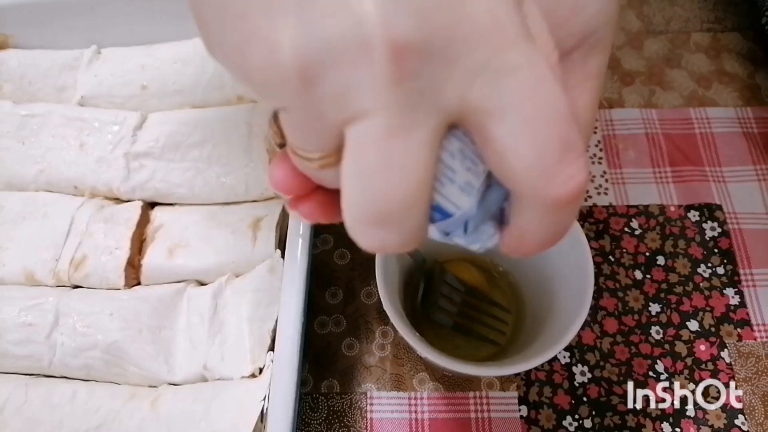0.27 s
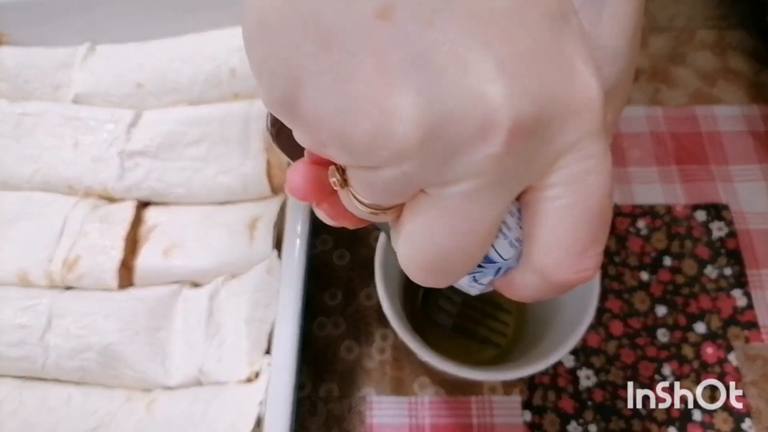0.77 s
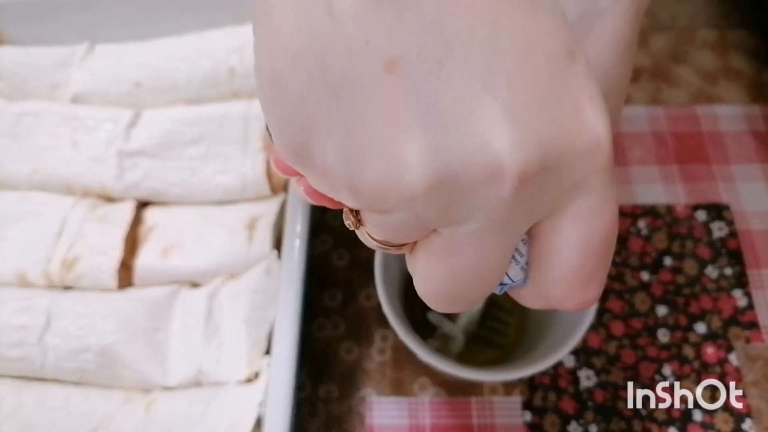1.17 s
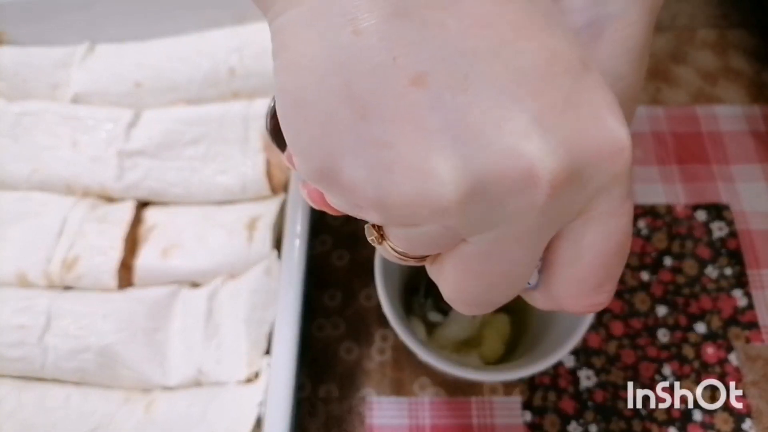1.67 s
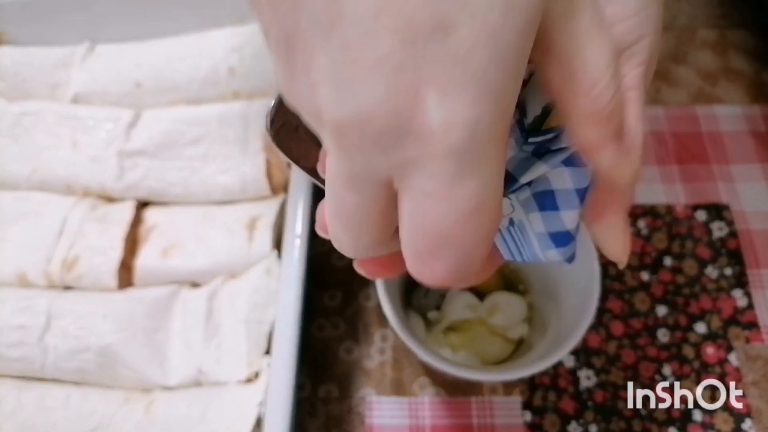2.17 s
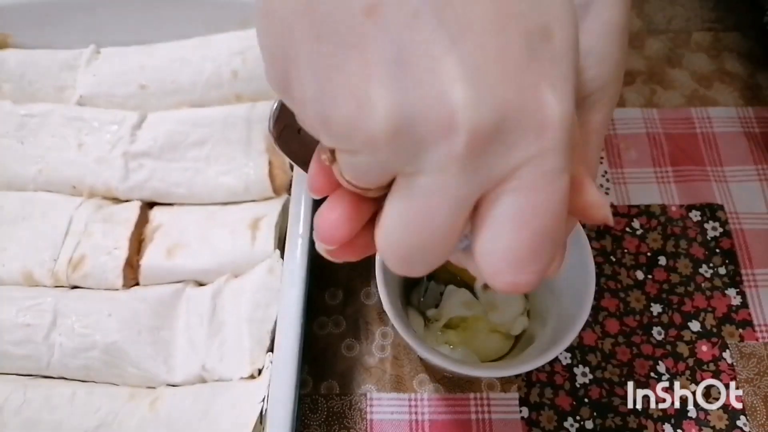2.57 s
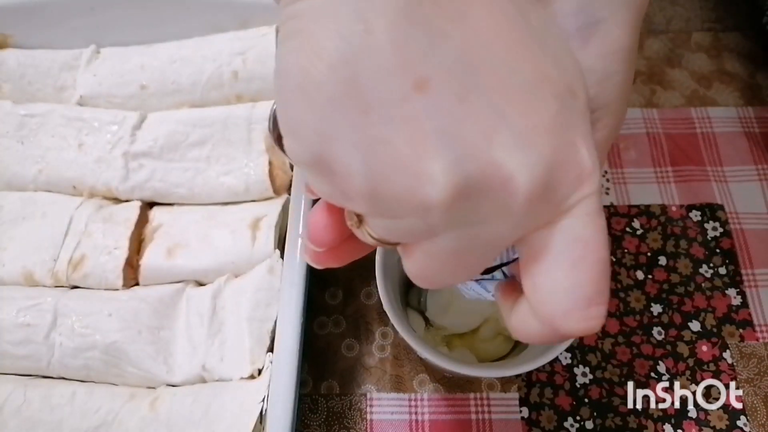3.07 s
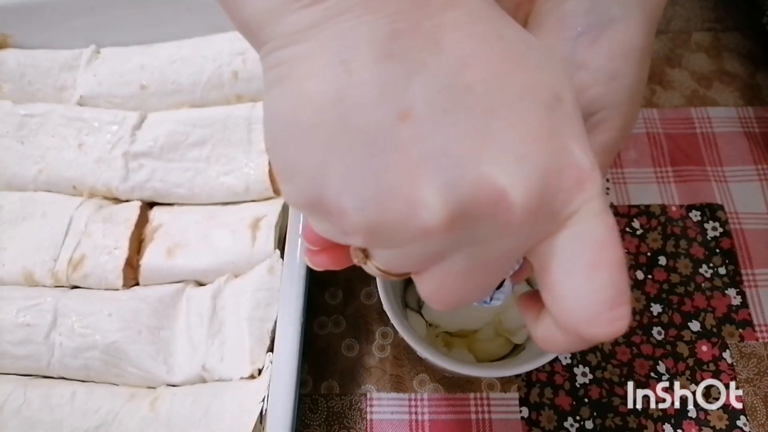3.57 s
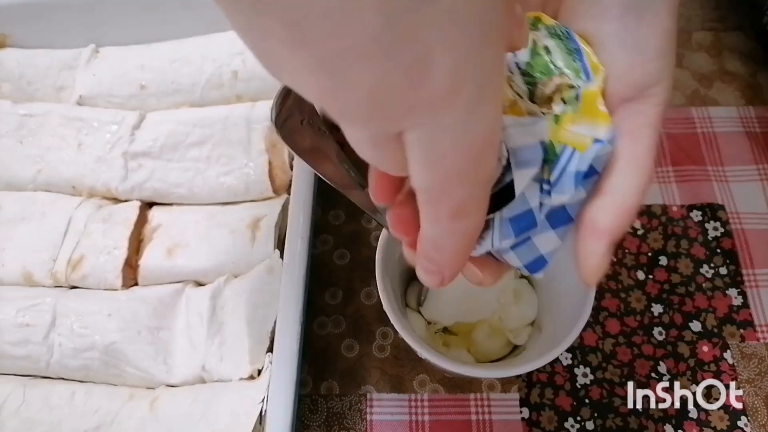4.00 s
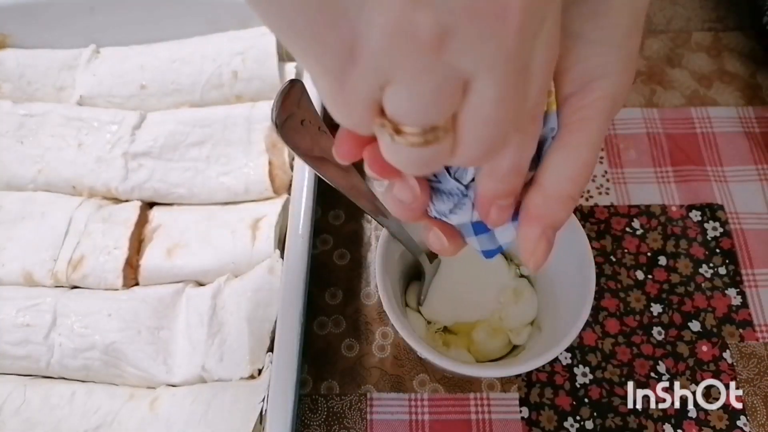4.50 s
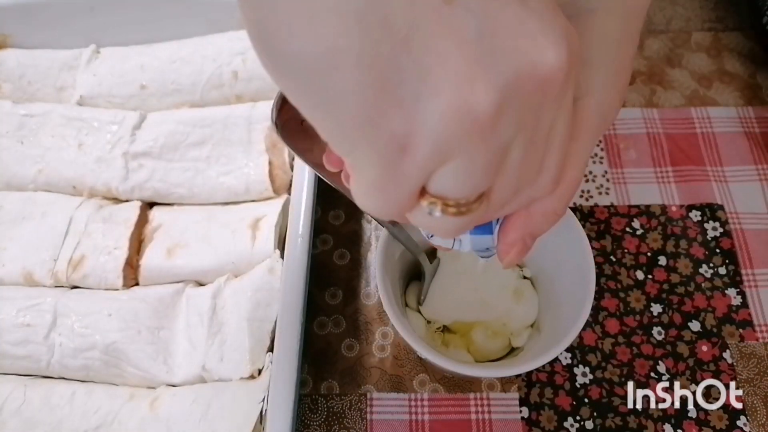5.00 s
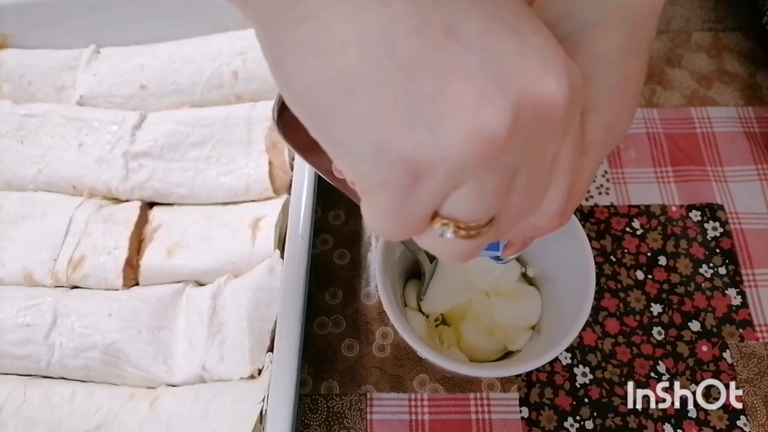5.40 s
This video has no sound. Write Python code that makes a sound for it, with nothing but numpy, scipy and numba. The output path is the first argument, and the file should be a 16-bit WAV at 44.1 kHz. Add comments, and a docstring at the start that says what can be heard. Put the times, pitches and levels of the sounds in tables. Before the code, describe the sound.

A close stereo perspective in a small, quiet kitchen with a short tail and faint steady hiss. At 0 s a thin, high steel ring from a fork knocked on a cup fades within about 0.3 s. Plastic film rustles dully, with padded finger bumps at 0.4-0.6 s and a crisp crease at 0.8 s. From about 1.2 to 2.0 s comes the longest, strongest squeeze: sharp bright pops and spitting air thicken over a wet gurgle, with hollow plops around 1000-1300 Hz, strongest near 1.5 and 1.8 s. Crinkling and soft kneading rumble follow until 3.0 s. A few pops lead into a second, shorter squelch at 3.3-3.7 s, ending in small hollow gulps. Creases snap at 3.8 s, then sparse quiet rustling; a barely audible low hum enters at 4.5 s. A brief third spurt at 5.1-5.4 s spits and plops, before a last crackle at 5.5-5.6 s.

```python
"""A fork knocked against a cup rings out, then a soft plastic pouch rustles as the hands take new grips.
In three squeezes air pops and spits at the torn corner and thick cream plops into the hollow of the cup.
Clicks are noise-scattered pushes into resonances; spit, gurgle and rustle are filtered random grains;
plops, bubbles, bumps and fork are decaying sines. A small kitchen tail, faint hum and hiss lie behind."""
import sys
import numpy as np
from scipy import signal
from scipy.fft import rfft, irfft, next_fast_len
from scipy.io import wavfile
from scipy.ndimage import uniform_filter1d
from numba import njit

SR = 44100
rng = np.random.default_rng(int(sys.argv[2]) if len(sys.argv) > 2 else 0)


def materialize(psi):
    """Save the field psi as 16-bit PCM at rate SR to the path in sys.argv[1].

    A 1-D psi becomes a single channel; in a 2-D psi each row is a channel.
    """
    bounded = np.clip(np.atleast_2d(psi).T, -1, 1)
    quanta = np.round(bounded * 32767).astype(np.int16)
    wavfile.write(sys.argv[1], SR, quanta)


N = 249184
T = np.arange(N) / SR

# Levels in the tables are before the trims (*_trim_db) in the functions.
# larger air pockets bursting at the opening: start_s, ring_hz, ring_db, spray_db, pouch_wall_db
POP_ROWS = [(1.1639, 9010, -57, -54, -64), (1.1982, 9200, -48, -55, -76), (1.2183, 10770, -48.5, -56, -79),
            (1.2664, 6400, -38.5, -32.5, -57), (1.299, 6110, -34, -41, -72), (1.3509, 6690, -47, -58, -76),
            (1.3645, 6690, -34.5, -55, -77), (1.3902, 6890, -42, -34, -60), (1.3974, 7530, -52, -31.5, -48),
            (1.4604, 7310, -42, -34.5, -63), (1.4781, 8490, -38.5, -40, -68),
            (1.5299, 7100, -37, -33.5, -37), (1.5421, 8240, -32, -50, -60), (1.5612, 8240, -29, -41, -66),
            (1.5786, 8240, -40, -34.5, -71), (1.653, 12570, -43, -43.5, -57),
            (1.6859, 8740, -29, -47, -44.5), (1.7205, 8050, -52, -42, -45),
            (1.8002, 7310, -56, -32.5, -42.5), (1.8351, 8490, -30, -47, -42), (1.8485, 8490, -31, -42, -47),
            (1.8654, 7760, -39, -46, -65), (1.8796, 8240, -29.5, -42, -59), (1.902, 6300, -29, -34.5, -70),
            (1.9118, 8240, -28.5, -39, -58), (1.9524, 9280, -42, -38, -62), (1.9656, 9560, -41.5, -40, -73),
            (3.0497, 9010, -38.5, -70, -57), (3.0854, 9010, -38.5, -44.5, -49),
            (3.1057, 8240, -30.5, -61, -75), (3.3045, 12500, -45, -49.5, -65.5),
            (3.3335, 9010, -37.5, -57.5, -75), (3.3616, 9280, -38, -43, -74),
            (3.3883, 10770, -36, -42.5, -36), (3.4157, 8740, -35.5, -44, -54),
            (3.4373, 4540, -26.5, -27.5, -47), (3.4704, 7530, -40.5, -41.5, -61.5),
            (3.5279, 1500, -44, -44.5, -44), (3.5523, 1600, -45.5, -52, -47.5),
            (5.0934, 12500, -52, -47, -72), (5.1074, 12500, -35, -43, -53), (5.1198, 3370, -38.5, -32, -37),
            (5.1714, 7530, -61, -33.5, -64), (5.1885, 8740, -42, -45, -54), (5.2372, 8490, -40, -39, -52.5),
            (5.3287, 12500, -45, -48, -73)]
# larger film creases snapping over: start_s, ring_hz, ring_db, snap_db, pouch_wall_db
CREASE_ROWS = [(.2968, 2430, -58.5, -83, -73), (.3849, 2680, -45.5, -70, -49), (.3945, 1880, -47, -70, -66),
               (.434, 8900, -54, -58, -42.5), (.4904, 8550, -50.5, -72, -44.5),
               (.5894, 7200, -51.5, -71, -81), (.6076, 7700, -57, -72, -43.5),
               (.8169, 8750, -34, -36.5, -41), (.9436, 2900, -47, -67, -61),
               (1.0094, 3280, -50.5, -54, -62), (1.0602, 9000, -50, -40.5, -43),
               (2.1513, 8100, -40.5, -53, -52), (2.3686, 8250, -59.5, -69, -49.5),
               (2.3955, 1720, -44.5, -78, -56), (2.4066, 2040, -45.5, -79, -70),
               (2.4294, 7100, -44, -41.5, -40), (2.4818, 1835, -51, -62, -68),
               (2.5275, 7150, -59.5, -65, -48.5), (2.6156, 1647, -56, -55.5, -55),
               (2.7854, 1470, -57, -80, -75), (2.8049, 1726, -62, -75, -56.5),
               (2.972, 8880, -52.5, -67, -80), (2.8506, 7930, -38, -39.5, -43.5),
               (3.393, 1920, -47.5, -42, -43.5), (3.769, 8400, -44, -32, -36),
               (3.8634, 7600, -51, -65, -45), (3.8704, 7400, -45, -45, -45.5),
               (4.3574, 5160, -48, -52, -51), (4.4395, 5100, -70, -74, -47.5),
               (4.5131, 3530, -59, -54.5, -47.5), (4.6056, 3150, -54.5, -69, -58),
               (4.6514, 5680, -50, -45, -50), (4.7511, 7500, -58.5, -75, -54.5),
               (4.8856, 1710, -56, -63, -51), (4.9275, 7300, -48, -48, -51),
               (4.9624, 1340, -48.5, -57, -45.5), (5.0083, 8300, -46.5, -36, -49),
               (5.0383, 7200, -48, -47, -70), (5.5819, 8300, -46.5, -47, -50),
               (5.5955, 7800, -51, -46, -46)]
# larger gulps of air ringing the hollow between hand and cup: start_s, level_db, t60_s
PLOP_ROWS = [(1.265, -43, 0.022), (1.35, -47, 0.031), (1.387, -41, 0.093), (1.425, -46, 0.14),
             (1.438, -39.5, 0.11), (1.478, -39, 0.054), (1.529, -24.5, 0.023), (1.605, -31, 0.0082),
             (1.7, -39, 0.071), (1.72, -41.5, 0.16), (1.798, -33, 0.069), (1.816, -28.5, 0.042),
             (1.886, -35, 0.051), (1.918, -35.5, 0.018), (1.963, -44, 0.035), (3.388, -48, .037),
             (3.528, -39.5, 0.04), (3.553, -38.5, 0.045), (3.767, -54, 0.077), (5.119, -37.5, 0.028),
             (5.136, -41, 0.029), (5.238, -32.5, 0.0033), (5.406, -50.5, 0.042)]
# pitch of the hollow; sinks as the first cream comes out, rises later, eases at the end: time_s, pitch_hz
HOLLOW_PITCH = [(1.25, 1284), (1.39, 1162), (1.43, 1023), (1.53, 992), (1.8, 1075), (1.95, 1082),
                (3.55, 1240), (5.1, 1167), (5.5, 1126)]
# cup resonances under the hands: centre_hz, half_width_hz (of one pass), level_db
CUP_MODES = [(134.7, 13, 6), (260, 41.4, 4), (348.3, 17, 8), (568, 33, 2), (708, 113, -5.5)]
# size classes of tiny bubbles and creases, plus a narrow fixed ring near 8.8 kHz over all the grains: ring_hz,
# width_hz (of one pass), level_db
FIZZ_CLASSES = [(2900, 990, -8.5), (4750, 2900, -12.5), (5740, 2600, -5), (8770, 1300, 0),
                (13000, 10000, -13.5)]
# squeezes pushing cream out: start_s, length_s, gurgle_db, hollow_db, fizz_db (levels before pressure build)
SQUEEZES = [(1.33, 0.606, -57, -57, -56), (3.3, 0.38, -57, -62, -58), (5.13, 0.3, -57, -62, -60.5)]
# new grips on the film: start_s, length_s, crackle_db, muffled_rustle_db, rumble_db
GRIPS = [(-.05, 0.23, -65, -66.5, -62), (.08, 0.057, -50.5, -55, -55.5), (.23, 0.43, -75, -66.5, -57.5),
         (.68, 0.1, -75, -80, -58), (.86, 0.22, -78, -70.5, -73), (1.12, 0.21, -64.5, -88, -60),
         (1.78, .12, -48, -55.5, -64), (1.92, 0.3, -55.5, -67.5, -86), (2.38, 0.44, -73.5, -69, -67),
         (2.88, .21, -73, -71, -63), (3.34, 0.063, -58, -57.5, -55), (3.64, 0.21, -55.5, -62.5, -78),
         (4.12, 0.2, -94, -95, -66.5), (4.33, 0.1, -64.5, -70, -83), (4.55, 0.75, -72.5, -73, -83),
         (5.51, 0.078, -56, -63.5, -71), (5.58, .1, -50, -61, -79)]
# soft bumps as fingers close on the pouch: start_s, pitch_hz, level_db (peak is 8.7 dB lower)
BUMPS = [(.380, 342, -43.5), (0.395, 107, -44), (0.492, 252, -38), (.497, 132, -38.5), (0.595, 233, -42),
         (4.962, 601, -56)]
# fork modes: pitch_hz, peak_db, t60_s
FORK_MODES = [(2563, -43, .29), (2466, -59, .25), (3564, -66, .22), (4145, -71, .22), (6950, -67, .2),
              (7670, -63, .2), (8697, -50, .12)]
# faint low hum: start_s, length_s, level_db
HUM_ROWS = [(4.5, .45, -70)]
# relative spectra: freq_hz, level_db (per Hz)
RUSTLE_SPECTRUM = [(300, 9.5), (600, 12.5), (1200, 10.5), (1900, 10), (2900, 11), (4000, -8.5),
                   (7000, -9.5)]
RUMBLE_SPECTRUM = [(20, -8.5), (40, -2), (65, 2), (100, -2.5), (150, 1.5), (250, -5.5), (400, -16),
                   (900, -39.5)]
HISS_SPECTRUM = [(15, -29.5), (25, 12), (137, 5.5), (427, -10), (775, -2.5), (2160, -24.5), (2690, -14),
                 (3920, -19.5), (8590, -17), (11000, -19.5), (14800, -16.5), (16000, -24)]
# relative spectrum of the room tail: freq_hz, level_db
KITCHEN_SPECTRUM = [(100, -13.5), (500, 4), (1100, 1), (2500, -0.9), (4600, -0.8), (8500, -3.3),
                    (12000, -2), (16000, -8)]

SQUEEZE_ATTACK_S, SQUEEZE_T60_S, PRESSURE_DB_PER_S = 0.11, 0.297, 12
AIR_LEAD_S, HOLLOW_LEAD_S = 0.077, 0.037  # air first, then hollow, then gurgle
GRIP_ATTACK_S, GRIP_T60_S = 0.032, 0.22
HOLD_CRACKLE_DB, HOLD_RUSTLE_DB, HOLD_RUMBLE_DB = -79.5, -76, -70  # pouch merely held
CLICK_S = 0.005  # a burst's level is its energy spread over this time
TOP_HZ = 16000


def undb(db):
    """Amplitude ratio of a level in dB."""
    return 10 ** (np.asarray(db) / 20)


def unit(x):
    """Scale to RMS 1."""
    return x / np.sqrt(np.mean(x ** 2))


def resonance(f, hz, width_hz):
    """Response of a band-pass, gain 1 at the centre."""
    return 1 / (1 + 1j * (f * f - hz * hz) / (width_hz * f + 1e-9))


def filtered(x, response):
    """Pass x through a response given as a function of frequency."""
    size = next_fast_len(x.shape[-1] + 512)
    f = np.arange(size // 2 + 1) * SR / size
    return irfft(rfft(x, size) * response(f), size)[..., :x.shape[-1]]


def colour(x, spectrum):
    """Shape x by a spectrum, straight in dB over log frequency."""
    hz, db = np.transpose(spectrum)
    return filtered(x, lambda f: undb(np.interp(np.log(f + 1), np.log(hz), db, left=db[0] - 23.5)))


def stereo(x, side):
    """Two unrelated signals become the shared and the opposed part of left and right."""
    return unit(x[0] + side * x[1] * np.array([[1], [-1]]))


def walk(rate_hz):
    """Random levels, held one step and slewed, RMS 1."""
    size = int(SR / rate_hz)
    steps = np.repeat(rng.standard_normal(N // size + 1), size)
    return unit(uniform_filter1d(steps, size)[:N])


def grains(rate_hz, spread_db, smear_s=0.0015):
    """Random tiny snaps, a few far larger than most, scattered separately into the two channels."""
    size = undb(spread_db * np.minimum(rng.exponential(size=N), 4))
    snaps = (rng.random(N) < rate_hz / SR) * size * rng.standard_normal((2, N))
    t = np.arange(220) / SR
    power = signal.fftconvolve(snaps ** 2, np.exp(-2 * t / smear_s)[None], axes=1)[:, :N]
    return np.sqrt(np.abs(power)) * rng.standard_normal((2, N))


def add(out, s, sound):
    """Mix a sound in at time s."""
    start = max(int(s * SR), 0)
    out[:, start:start + sound.shape[1]] += sound[:, :max(N - start, 0)]


@njit
def moving_band(x, hz, width_hz):
    """State-variable band-pass whose centre moves."""
    y, band, low = np.empty(len(x)), 0., 0.
    for i in range(len(x)):
        g, k = np.tan(np.pi * hz[i] / SR), width_hz / hz[i]
        v = (band + g * (x[i] - low)) / (1 + g * (g + k))
        band, low, y[i] = 2 * v - band, low + 2 * g * v, k * v
    return y


def gestures(rows, attack_s, t60_s, build_db_per_s=0):
    """Each gesture sets in, builds while it lasts and dies away; one gain curve per level column."""
    power = 0
    for start, length, *levels in rows:
        age = T - start
        build_db = build_db_per_s * np.clip(age, 0, length)
        decay_db = 60 * np.maximum(age - length, 0) / t60_s
        shape = np.clip(age / attack_s, 0, 1) * undb(build_db - decay_db)
        power = power + (undb(levels)[:, None] * shape) ** 2
    return np.sqrt(power)


def squeezing():
    """Gains of gurgle, hollow and fizz: pressure grows for as long as a squeeze lasts."""
    gurgle, hollow, fizz = gestures(SQUEEZES, SQUEEZE_ATTACK_S, SQUEEZE_T60_S, PRESSURE_DB_PER_S)
    return gurgle, np.interp(T + HOLLOW_LEAD_S, T, hollow), np.interp(T + AIR_LEAD_S, T, fizz)


def gripping():
    """Gains of crackle, rustle and rumble while the fingers shift."""
    return gestures(GRIPS, GRIP_ATTACK_S, GRIP_T60_S)


def burst(hz, width_hz, db, scatter, decay_s):
    """One sharp push into a resonance, followed by its scatter off fingers and cup wall."""
    t = np.arange(700) / SR
    push = rng.standard_normal((2, len(t))) * np.exp(-t / decay_s) * (1 - np.exp(-t / 0.00047))
    push *= scatter / np.sqrt(decay_s * SR / 2)
    push[0, 0] += 1
    push[1, 2] += 1  # right channel two samples later
    y = filtered(push, lambda f: resonance(f, hz, width_hz) ** 3)
    return y * undb(db) * np.sqrt(2 * CLICK_S * SR / np.sum(y ** 2))


def clicks(rows, ring_q, scatter, decay_s, snap_hz, snap_width_hz, wall_hz, wall_width_hz, wall_decay_s,
           ring_trim_db, snap_trim_db, wall_trim_db):
    """Each click has its own ring, a broad snap and a duller knock of the pouch wall."""
    out = np.zeros((2, N))
    for s, hz, ring_db, snap_db, wall_db in rows:
        # the strongest burst clear of the fingers: more direct sound, less scatter
        direct_scatter = scatter / (1 + undb(max(ring_db, snap_db) + 28))
        ring = burst(hz, hz / ring_q, ring_db + ring_trim_db, direct_scatter, decay_s)
        snap = burst(snap_hz, snap_width_hz, snap_db + snap_trim_db, direct_scatter, decay_s)
        wall = burst(wall_hz, wall_width_hz, wall_db + wall_trim_db, scatter, wall_decay_s)
        add(out, s, ring + snap + wall)
    return out


def small_clicks(gain, per_s, hz, octaves, ring_db, snap_db, wall_db, spread_db):
    """Rows for the lesser clicks: random in time and pitch, as strong as the gesture that frees them."""
    rows = []
    for slot, (when, pitch, size) in enumerate(rng.uniform(-1, 1, (int(per_s * N / SR), 3))):
        s = (slot + .5 + .5 * when) / per_s
        db = 20 * np.log10(gain[int(s * SR)] + 1e-9) + spread_db * size
        if db > -85:
            rows.append((s, hz * 2 ** (octaves * pitch), db + ring_db, db + snap_db, db + wall_db))
    return rows


def pops():
    """Air pockets burst at the torn corner, the small ones following the fizz of each squeeze."""
    small = small_clicks(squeezing()[2], per_s=40, hz=8870, octaves=0.081,
                         ring_db=2, snap_db=3, wall_db=-18.5, spread_db=5.5)
    return clicks(list(POP_ROWS) + small, ring_q=3.7, scatter=3.4, decay_s=0.0017,
                  snap_hz=7930, snap_width_hz=10000, wall_hz=2800, wall_width_hz=890, wall_decay_s=0.0017,
                  ring_trim_db=0.0, snap_trim_db=-1.5, wall_trim_db=-5)


def spray(trim_db=-6, hz=12800, width_hz=7000, spurt_db=6.0):
    """Air forced through the wet corner of the pouch spits in fine, very bright grains."""
    spurts = undb(spurt_db * walk(50))
    spit = filtered(grains(500, 3.5) * spurts, lambda f: resonance(f, hz, width_hz) ** 2)
    return unit(spit) * squeezing()[2] * undb(trim_db)


def plops(sag=0.058, sag_s=0.0088, thud_trim_db=-10, plop_trim_db=5.0, rise_s=0.0009):
    """The hollow rings briefly and sags in pitch; the lump of cream adds a soft thud."""
    out, t = np.zeros((2, N)), np.arange(SR // 10) / SR
    lean_db = np.array([[1.5], [-1.5]])
    for s, db, t60 in PLOP_ROWS:
        hz = np.interp(s, *np.transpose(HOLLOW_PITCH))
        sagging_hz = hz * (1 + sag * (np.exp(-t / sag_s) - .65))
        phase = 2 * np.pi * np.cumsum(sagging_hz) / SR
        ring = np.sin(phase) * (1 - np.exp(-(t / rise_s) ** 2)) * undb(-60 * t / t60)
        add(out, s, undb(db + plop_trim_db + lean_db) * ring)
        add(out, s, burst(946, 1210, db + thud_trim_db, 1.0, 0.012))
    return out


def cream(hollow_width_hz=85, sputter_db=4.5, waver=0.037):
    """Cream leaves in a dense sputter of small gulps that drive the cup's resonances and the hollow."""
    low_gain, hollow_gain, _ = squeezing()
    gulps = stereo(grains(900, 1), 0.16) * undb(sputter_db * np.tanh(walk(80)))
    gurgle = filtered(gulps, lambda f: sum(undb(db) * resonance(f, hz, 2 * half_width) ** 2
                                           for hz, half_width, db in CUP_MODES))
    # the strand of cream keeps reshaping the hollow
    hollow_hz = np.interp(T, *np.transpose(HOLLOW_PITCH)) * np.exp(waver * walk(30))
    ring = np.array([moving_band(side, hollow_hz, float(hollow_width_hz)) for side in gulps])
    ring = filtered(ring, lambda f: resonance(f, 830, 420))  # soft gulps excite little far from the ring
    lean_db = np.array([[1.3], [-1.3]])  # hollow to the left, lows to the right
    return unit(gurgle) * low_gain * undb(-lean_db) + unit(ring) * hollow_gain * undb(lean_db)


def bubbles(per_s=90, hz=740, octaves=0.453, t60_cycles=17, glide=.08, trim_db=3, spread_db=4, lean_db=0.5):
    """Small pockets in the running cream open with short blips, each at its own pitch, rising a little."""
    out, t, flow = np.zeros((2, N)), np.arange(SR // 20) / SR, squeezing()[0]
    draws = rng.standard_normal((int(per_s * N / SR), 4)).clip(-2, 2)
    for slot, (pitch, size, when, lean) in enumerate(draws):
        s = (slot + .5 + when / 4) / per_s
        f = hz * 2 ** (octaves * pitch)
        age = t * f / t60_cycles
        blip = np.sin(2 * np.pi * f * t * (1 + glide * np.minimum(age, 1))) * undb(-60 * age)
        db = trim_db + spread_db * size + lean_db * lean * np.array([[1], [-1]])
        add(out, s, np.interp(s, T, flow) * undb(db) * blip)
    return out


def creases():
    """Folds of the film snap over, the small ones following the rustle of each grip."""
    small = small_clicks(gripping()[1], per_s=24, hz=1940, octaves=0.66,
                         ring_db=-2.5, snap_db=-7, wall_db=-2, spread_db=8.5)
    return clicks(list(CREASE_ROWS) + small, ring_q=2.1, scatter=1.9, decay_s=0.0027,
                  snap_hz=9000, snap_width_hz=14000, wall_hz=2070, wall_width_hz=3270, wall_decay_s=0.0038,
                  ring_trim_db=0.5, snap_trim_db=-3, wall_trim_db=-3)


def film(wringing_db=-14):
    """Tiny wet bubbles and creases fizz in the open in size classes; film rustles dully inside the fist."""
    fizz, (crinkle, rub, _) = squeezing()[2], gripping()
    bright = np.sqrt(fizz ** 2 + crinkle ** 2 + undb(HOLD_CRACKLE_DB) ** 2)
    dull = np.sqrt((fizz * undb(wringing_db)) ** 2 + rub ** 2 + undb(HOLD_RUSTLE_DB) ** 2)
    spurts = undb(5.63 * walk(60))
    crackle = 0
    for hz, width_hz, db in FIZZ_CLASSES:
        band = filtered(grains(1100, 2.7) * spurts, lambda f: resonance(f, hz, width_hz) ** 2)
        crackle = crackle + undb(db) * unit(band)
    rustle = colour(stereo(grains(900, 4.96), 0.68) * spurts, RUSTLE_SPECTRUM)
    return unit(crackle) * bright + unit(rustle) * dull


def hands(rumble_trim_db=-2, bump_s=0.0068):
    """Soft uneven rumble of kneading the pouch, with a few padded bumps."""
    noise = stereo(rng.standard_normal((2, N)), 0.49)
    rumble = colour(noise, RUMBLE_SPECTRUM) * undb(1.1 * walk(25))
    effort = np.hypot(gripping()[2], undb(HOLD_RUMBLE_DB))
    out, t = unit(rumble) * effort * undb(rumble_trim_db), np.arange(SR // 10) / SR
    swell = t / bump_s * np.exp(-t / bump_s)
    for s, hz, db in BUMPS:
        add(out, s, undb(db) * np.sin(2 * np.pi * hz * t)[None] * swell)
    return out


def fork():
    """The steel fork, just knocked against the cup, rings out in decaying modes."""
    return sum(undb(db - 60 * T / t60) * np.sin(2 * np.pi * hz * T + np.pi * rng.random((2, 1)))
               for hz, db, t60 in FORK_MODES)


def kitchen(x, wet_db=-11, t60_s=0.26, gap_s=0.0036, low_noise_db=-17, low_t60_s=1.0):
    """A short diffuse tail from table top and walls, unrelated left and right; the lows ring longer."""
    t = np.arange(SR // 2) / SR
    noise = rng.standard_normal((2, 2, len(t))) * (t > gap_s)
    tail = colour(noise[0] * undb(-60 * t / t60_s), KITCHEN_SPECTRUM)
    tail *= undb(wet_db) / np.sqrt(np.sum(tail ** 2) / 2)
    low = noise[1] * undb(-60 * t / low_t60_s)
    low *= undb(low_noise_db) / np.sqrt(np.sum(low ** 2) / 2)  # level before the band-pass
    tail += filtered(low, lambda f: resonance(f, 310, 700))
    return x + signal.fftconvolve(x, tail, axes=1)[:, :N]


def hum(hz=151, width_hz=12, attack_s=.08, t60_s=0.49):
    """A narrow band of noise: a low tone wavering faintly, setting in between the last two squeezes."""
    tone = filtered(rng.standard_normal(N), lambda f: resonance(f, hz, width_hz) ** 2)
    return unit(tone) * gestures(HUM_ROWS, attack_s, t60_s)


def hiss(level_db=-69):
    """Faint steady coloured noise."""
    noise = stereo(rng.standard_normal((2, N)), 0.75)
    return unit(colour(noise, HISS_SPECTRUM)) * undb(level_db)


def scene():
    """Pouch, cream and cup with the room tail; fork, hands, hum and hiss without it."""
    pouch = pops() + spray() + creases() + film()
    cup = plops() + cream() + bubbles()
    return kitchen(pouch + cup) + fork() + hands() + hum() + hiss()


def record(dry):
    """Steep elliptic low-pass at TOP_HZ."""
    return signal.sosfilt(signal.ellip(10, .2, 70, TOP_HZ, fs=SR, output="sos"), dry)


dry = scene()
out = record(dry)
materialize(out)
```